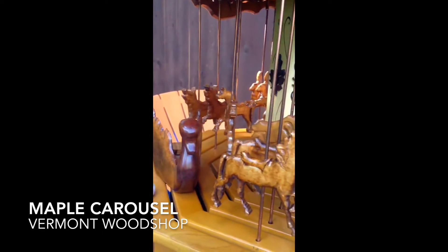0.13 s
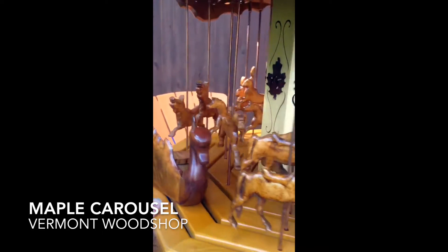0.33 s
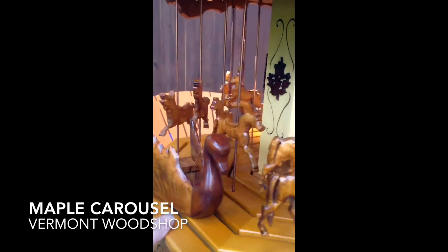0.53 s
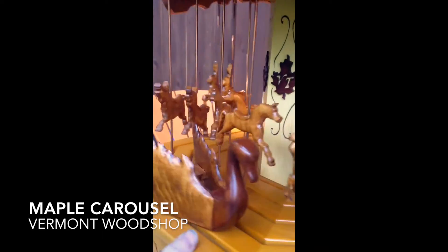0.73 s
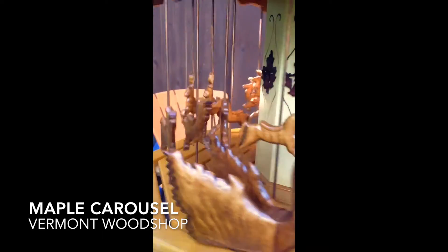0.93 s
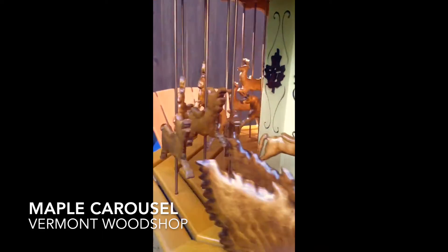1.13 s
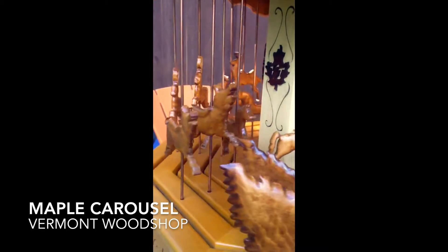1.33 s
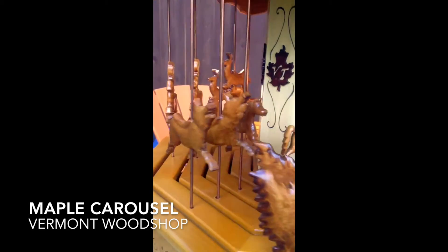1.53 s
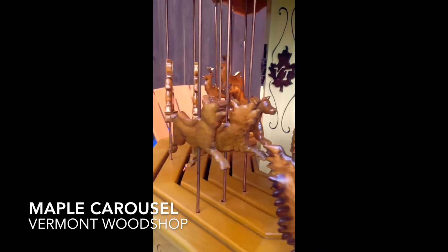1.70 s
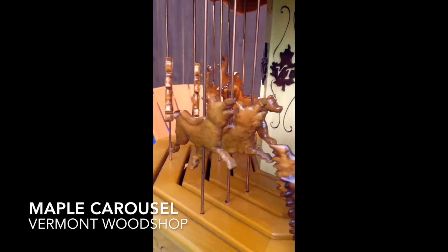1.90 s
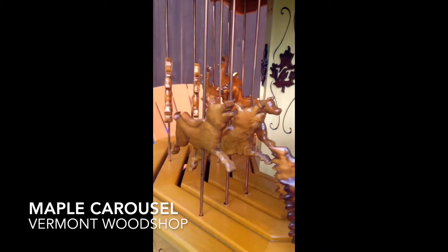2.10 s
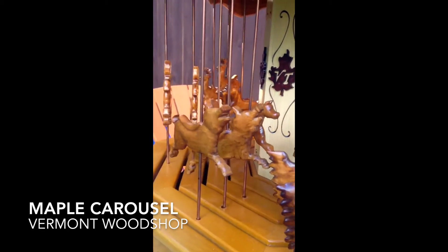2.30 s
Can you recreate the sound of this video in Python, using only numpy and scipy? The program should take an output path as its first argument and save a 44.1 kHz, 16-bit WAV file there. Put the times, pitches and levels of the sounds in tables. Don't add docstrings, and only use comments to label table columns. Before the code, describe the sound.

A wooden model carousel is pushed round twice, rumbling, rubbing and knocking, then coasts to rest

```python
import sys
import numpy as np
from scipy import signal
from scipy.fft import rfft, irfft
from scipy.io import wavfile
from scipy.ndimage import uniform_filter1d

SR = 44100
rng = np.random.default_rng(int(sys.argv[2]) if len(sys.argv) > 2 else 0)


def nominal_scale(level):
    x = np.asarray(level, float) / 20
    return 10 ** x


def dump(signal):
    limited = np.clip(np.atleast_2d(signal).T, -1, 1)
    pcm = np.round(limited * 32767).astype(np.int16)
    wavfile.write(sys.argv[1], SR, pcm)


N = 103635


def evened(x):
    return x / np.sqrt(np.mean(x ** 2) + 1e-20)


def colour(x, points):
    f, db = np.transpose(points)
    hz = np.fft.rfftfreq(len(x), 1 / SR)
    gain_db = np.interp(np.log(hz + 1), np.log(f + 1), db, left=-90)
    return irfft(rfft(x) * nominal_scale(gain_db), len(x))


def add(mix, s, sound):
    part = mix[round(s * SR):][:len(sound)]
    part += sound[:len(part)]


def resonate(x, hz, width):
    spin = np.exp(2j * np.pi * np.cumsum(hz * np.ones(len(x))) / SR)
    r = np.exp(-np.pi * abs(width) / SR)
    return 2 * (spin * signal.lfilter([1 - r], [1, -r], x / spin)).real


def steep_resonance(x, hz, width):
    return resonate(resonate(x, hz, width), hz, width)


def air():
    # (frequency [Hz], level [dB per Hz])
    air_colour = [(20, -36), (100, -24), (200, -9.5), (400, -7.5), (600, -13.5), (2000, -18.5),
                  (7000, -31.5), (15800, -45)]
    return nominal_scale(-61.5) * evened(colour(rng.standard_normal(N), air_colour))


def room(x):
    t60_s, taps_per_s, first_tap_s = 0.1, 2000, 0.004
    t = np.arange(SR // 3) / SR
    taps = rng.choice([-1., 1.], len(t)) * (rng.random(len(t)) < taps_per_s / SR)
    taps = taps * (t > first_tap_s) * nominal_scale(-60 * t / t60_s)
    taps = uniform_filter1d(taps, size=4)
    return signal.fftconvolve(x, taps / np.linalg.norm(taps))[:N]


def singing(rows):
    out = np.zeros(N)
    noise = rng.standard_normal((len(rows), SR // 2))
    for (s, length, hz, db, width), n in zip(rows, noise):
        u = np.arange(0, length, 1 / SR) / length
        tone = steep_resonance(n, hz, width)[-len(u):]
        add(out, s, nominal_scale(db) * evened(tone) * np.sin(np.pi * u ** 0.68))
    return out


def bearing():
    # (start [s], length [s], frequency [Hz], level [dB], width [Hz])
    bearing_tones = [(1.362, .08, 380, -50, 17), (.594, .05, 2290, -51, 60), (0.598, 0.03, 3760, -48, 90),
                     (0.71, 0.2, 2290, -45, 90), (1.35, 0.11, 12700, -55, 90), (1.688, 0.2, 5390, -57, 70),
                     (1.686, .012, 14600, -50, 300), (1.3, .012, 14600, -55, 300),
                     (1.726, 0.012, 14600, -48, 300), (1.752, .012, 14700, -53, 300),
                     (1.776, .009, 14700, -54, 300), (.1, .14, 2290, -59, 60), (.462, .04, 2300, -46, 60),
                     (1.17, .07, 3850, -50, 150), (1.27, .07, 3880, -53, 220), (.93, .1, 2780, -41, 140),
                     (2.018, .016, 1720, -55, 150), (1.959, .012, 3010, -58, 200),
                     (1.987, .01, 5670, -49, 200)]
    return singing(bearing_tones)


def base_rings():
    # (start [s], length [s], frequency [Hz], level [dB], width [Hz])
    base_tones = [(.185, .03, 353, -39, 40), (.725, .04, 389.5, -37, 36), (1.98, .04, 277.4, -54, 26),
                  (.28, 0.044, 301.7, -36.5, 20), (.8, 0.049, 381.4, -34, 16), (.94, 0.047, 380, -32, 19),
                  (.99, .04, 294, -34, 19), (1.016, .04, 400.6, -32.5, 13), (1.17, .05, 405, -47, 20),
                  (1.52, .06, 364.5, -43, 12.6), (1.63, 0.04, 379.4, -39.5, 20), (1.5, 0.062, 283, -44, 23),
                  (1.88, .05, 272, -52, 16)]
    return singing(base_tones)


def moan():
    start_s, start_hz, level_db, swell_s, sag_hz_per_s = .538, 400, -30.5, .027, 90
    u = np.maximum(np.arange(N) / SR - start_s, 0)
    swell = u / swell_s * np.exp(1 - u / swell_s)
    return nominal_scale(level_db) * swell * np.sin(2 * np.pi * (start_hz * u - sag_hz_per_s * u ** 2 / 2))


def knocks(rows, modes, blow_s, top_hz):
    # (frequency [Hz], level [dB per Hz])
    rattle_colour = [(300, -25), (600, -3), (1500, -.5), (2700, -4), (9000, -20)]
    rattle_db, flutter, flutter_hz = -4.5, 0.074, 90
    out, t = np.zeros(N), np.arange(5000) / SR
    noise = rng.standard_normal((len(rows), len(t)))
    rise = 1 - np.exp(-(t / blow_s) ** 2 * 3)
    b, a = signal.butter(4, top_hz, fs=SR)
    for (s, db, tilt_db), n in zip(rows, noise):
        rattle = evened(signal.lfilter(b, a, colour(n, rattle_colour)))
        hit = nominal_scale(rattle_db) * rattle * np.exp(-t / blow_s / 2)
        for k, (hz, mode_db, t60) in enumerate(modes):
            ring = np.sin(2 * np.pi * (hz * t + n[k]))
            ring = ring * (1 + flutter * np.sin(2 * np.pi * (flutter_hz * t + n[-k])))
            hit = hit + nominal_scale(mode_db + tilt_db * np.log2(hz / 1000) - 60 * t / t60) * ring
        add(out, s, nominal_scale(db) * rise * hit / abs(rise * hit).max())
    return out


def figure_taps():
    # (time [s], peak [dB], tilt [dB per octave])
    tap_times = [
        (1.1355, -17, -0.2),
        (1.150, -31, 1),
    ]
    # (frequency [Hz], level [dB], t60 [s])
    tap_modes = [(580, -2, .07), (1150, -13, .04), (1550, 1.5, .035), (2300, -6, .03), (2600, -10, .03)]
    return knocks(tap_times, tap_modes, blow_s=.0058, top_hz=3070)


def figure_clacks():
    # (time [s], peak [dB], tilt [dB per octave])
    clack_times = [
        (1.461, -14, 2),
        (1.960, -46.5, 9),
        (1.974, -43.5, -8),
        (2.022, -44.5, 5),
        (2.034, -45, 8),
    ]
    # (frequency [Hz], level [dB], t60 [s])
    clack_modes = [(568, -.5, .075), (900, -11, .045), (1009, -6, .06), (1550, -1.5, .05), (2100, -10, .03),
                   (2570, -6, .04), (3650, -14, .025), (4620, -15, .025)]
    return knocks(clack_times, clack_modes, blow_s=.0058, top_hz=5400)


def platform_thuds():
    # (time [s], peak [dB], tilt [dB per octave])
    thud_times = [
        (.292, -23.5, -0.5),
        (.361, -29.5, 21),
        (.521, -21, -4),
        (.788, -19.5, -3.5),
        (.942, -17.5, -2),
        (1.645, -53, 1),
    ]
    # (frequency [Hz], level [dB], t60 [s])
    thud_modes = [(340, -6, .03), (582, -2, .05), (1030, -10, .04), (1164, 0, .055), (1470, -9, .03),
                  (1720, -11, .03), (2110, -9, .035), (2450, -10, .03)]
    return knocks(thud_times, thud_modes, blow_s=.006, top_hz=2380)


def slips():
    # (time [s], peak [dB], ring [Hz])
    slip_times = [(0.119, -54, 8160), (.144, -53, 3890), (1.453, -46, 4230), (.229, -57, 12000),
                  (0.257, -54, 3800), (0.278, -30.5, 9900), (.327, -24, 3580), (.415, -28.5, 11700),
                  (0.475, -27, 13600), (0.554, -32, 13600), (.600, -34, 3800), (0.639, -33.5, 8300),
                  (0.678, -30, 12400), (0.845, -31, 4000), (.186, -43, 4780), (.705, -31, 9100),
                  (0.765, -32.5, 4600), (0.838, -35, 14000), (.88, -20, 3200), (1.010, -33, 4580),
                  (1.044, -22, 4850), (1.06, -24, 3300), (1.077, -21, 2830), (.975, -32, 2760),
                  (1.175, -32, 10900), (1.199, -36, 4840), (1.231, -40, 14000), (1.284, -31, 3900),
                  (1.308, -38, 3900), (1.327, -35, 5670), (1.353, -31, 3900), (1.392, -33.5, 3830),
                  (1.431, -37.5, 12600), (1.688, -42, 2300), (1.83, -48, 7700), (1.913, -52, 4970),
                  (2.058, -59, 9100), (1.089, -18, 5160), (1.161, -27, 4700), (1.258, -28.5, 5540),
                  (1.46, -27.5, 7900), (1.514, -29.5, 14000), (1.529, -45, 8100), (1.558, -29, 8120),
                  (1.586, -44, 9000), (1.656, -30.5, 5370), (1.725, -35, 8380), (1.744, -37.5, 9600),
                  (1.859, -45.5, 6500), (1.959, -47, 8100), (1.988, -41.5, 8000), (2.018, -40.5, 6950),
                  (2.027, -44.5, 5800), (2.002, -46, 3170), (1.648, -36, 2300), (1.776, -46, 10600),
                  (2.051, -49, 14500)]
    # (frequency [Hz], level [dB per Hz])
    slip_colour = [(500, -29), (1200, -28), (2500, -12.5), (10600, -22), (15400, -25), (15900, -48)]
    rise_s, decay_s, width_hz = 0.0016, 0.0054, 270
    slip_db, ring_db, spot_db = -9.5, 2, -10
    out, t = np.zeros(N), np.arange(2048) / SR
    noise = rng.standard_normal((len(slip_times), len(t)))
    chance_hz = rng.uniform(3500, 15000, (len(slip_times), 5))
    envelope = np.minimum(t / rise_s, 1) * np.exp(-t / decay_s)
    for (s, db, hz), n, more in zip(slip_times, noise, chance_hz):
        spots = sum(evened(resonate(n, f, width_hz)) for f in more)
        rings = evened(resonate(n, hz, width_hz)) + nominal_scale(spot_db) * spots
        hiss = evened(colour(n, slip_colour)) + nominal_scale(ring_db) * rings
        add(out, s, nominal_scale(db + slip_db) * hiss * envelope)
    return out


def turning(column):
    # (time [s], rolling load [dB], rubbing pressure [dB], fine dust [dB], lean towards the rim [dB])
    turn_levels = np.array([(0.06, -75, -70, -80, 4), (0.13, -60, -57, -75, -10),
                            (0.198, -41, -47, -54.5, 0.5), (0.28, -36.5, -40, -48, -3.5),
                            (0.36, -35, -31.5, -35.5, -0.5), (0.461, -43, -39, -41, -0.5),
                            (0.573, -54, -51, -57, 13), (0.661, -41, -42.5, -46, -8),
                            (0.78, -34.5, -37, -43, 2), (0.95, -32, -27.5, -33, 0.5),
                            (1.07, -36, -32, -35.5, 0.5), (1.201, -42.5, -43, -46, 6),
                            (1.3, -51, -43, -46.5, -5), (1.46, -42.5, -44, -50, 0.5),
                            (1.64, -41.5, -46, -49, -1), (1.84, -51.5, -55.5, -58.5, -9),
                            (1.94, -60, -66, -79, -6), (2.1, -67, -79, -85, 3)])
    return nominal_scale(np.interp(np.arange(N) / SR, turn_levels[:, 0], turn_levels[:, column]))


def grit():
    catches_per_s, spread_db = 3000, 1
    size = nominal_scale(spread_db * np.minimum(rng.exponential(1, N), 4))
    catches = size * rng.standard_normal(N) * (rng.random(N) < catches_per_s / SR)
    return evened(catches) + rng.standard_normal(N)


def patchy(x):
    z = signal.stft(x, nperseg=256, noverlap=192)[2]
    spots = uniform_filter1d(rng.standard_normal(z.shape), size=2, axis=0)
    spots = uniform_filter1d(spots, size=12, axis=1)
    z = z * nominal_scale(2.5 * evened(spots))
    return signal.istft(z, nperseg=256, noverlap=192)[1][:N]


def rubbing():
    # (frequency [Hz], width [Hz], level [dB])
    face_modes = [(1006, 59, 6), (1183, 27, -1), (1572, 100, 0), (1726, 140, 4.5), (2300, 410, 3),
                  (2750, 73, 5.5), (3484, 23, 4), (3900, 330, 1.5), (4655, 130, 0), (5500, 270, 2)]
    # (frequency [Hz], level [dB per Hz])
    rub_colour = [(450, -8), (650, -7.5), (1200, -5), (2500, -6), (5200, -7.5), (6500, -28.5), (9000, -33)]
    # (frequency [Hz], level [dB per Hz])
    dust_colour = [(3000, -52), (5500, 2.5), (7000, 0.5), (11000, -1.5), (15400, -2.5), (15900, -53)]
    chatter_per_s, chatter_s, chatter_db, dust_chatter_db = 100, 0.025, 9, 13
    drive = grit()
    starts = rng.random(N) * (rng.random(N) < chatter_per_s / SR)
    chatter = np.tanh(signal.lfilter([1], [1, -np.exp(-1 / (chatter_s * SR))], starts))
    chatter = chatter - uniform_filter1d(chatter, size=3000)
    ringing = evened(sum(nominal_scale(db) * evened(steep_resonance(drive, hz, w)) for hz, w, db in face_modes))
    faces = evened(colour(drive, rub_colour)) + nominal_scale(-9) * ringing
    faces = patchy(faces) * nominal_scale(chatter_db * chatter)
    dust = patchy(colour(grit(), dust_colour)) * nominal_scale(dust_chatter_db * chatter)
    return turning(column=2) * evened(faces) + turning(column=3) * evened(dust)


def rumble():
    # (frequency [Hz], width [Hz], level [dB])
    base_modes = [(221.7, 34, -14.5), (274.5, 39, -3), (304.3, 29.7, -4.5), (371.8, 38.6, -1),
                  (400, 23, -4), (481, 57, -11.5), (589.5, 54, -8)]
    lean_hz, wander, wander_s = 335, .018, .07
    drive, lean, out = grit(), np.sqrt(turning(column=4)), np.zeros(N)
    span = round(wander_s * SR)
    for hz, width, db in base_modes:
        drift = uniform_filter1d(uniform_filter1d(rng.standard_normal(N), span), span)
        hz_now = hz * (1 + wander * evened(drift))
        mode = evened(steep_resonance(drive, hz_now, width))
        out += nominal_scale(db) * mode * lean ** np.sign(hz - lean_hz)
    return turning(column=1) * evened(out)


def scene():
    hits = slips() + bearing() + base_rings()
    hits = hits + platform_thuds() + figure_taps() + figure_clacks()
    wood = hits + nominal_scale(-17) * room(hits) + rumble() + rubbing() + moan()
    b, a = signal.butter(4, 137, "high", fs=SR)
    return (signal.lfilter(b, a, wood) + air())[None]


def low_pass(x):
    return signal.sosfilt(signal.butter(12, 16850, fs=SR, output="sos"), x)


def record(dry):
    limited = signal.oaconvolve(dry, signal.firwin(255, 16000, fs=SR)[None], "same")
    return low_pass(limited)


dry = scene()
out = record(dry)
dump(out)
```